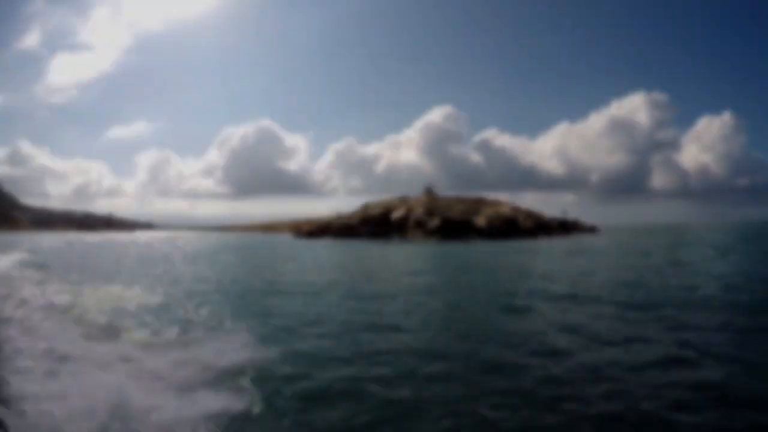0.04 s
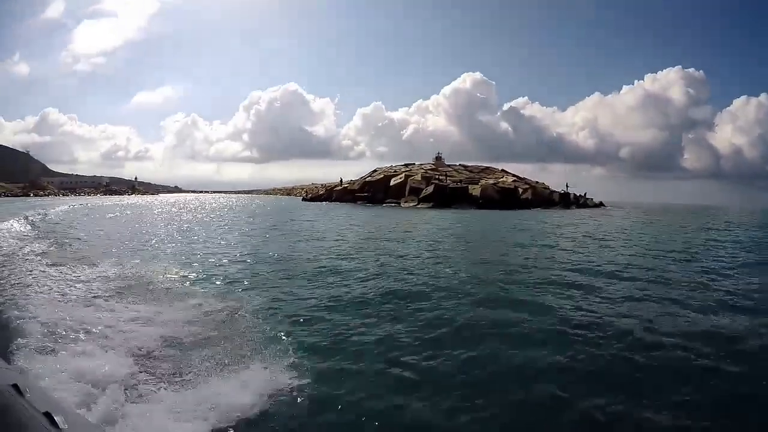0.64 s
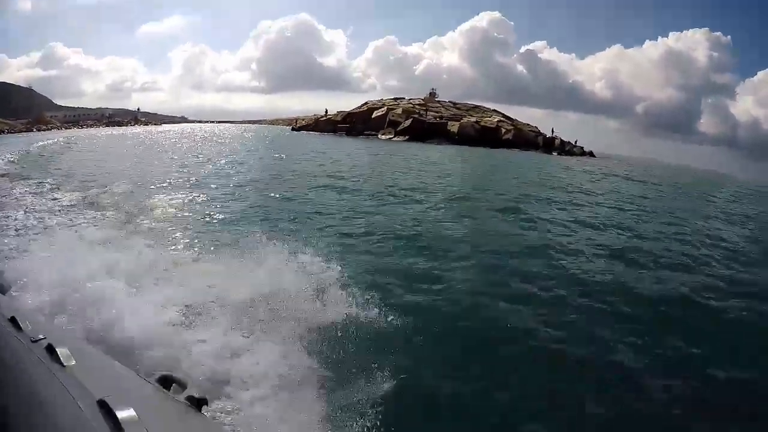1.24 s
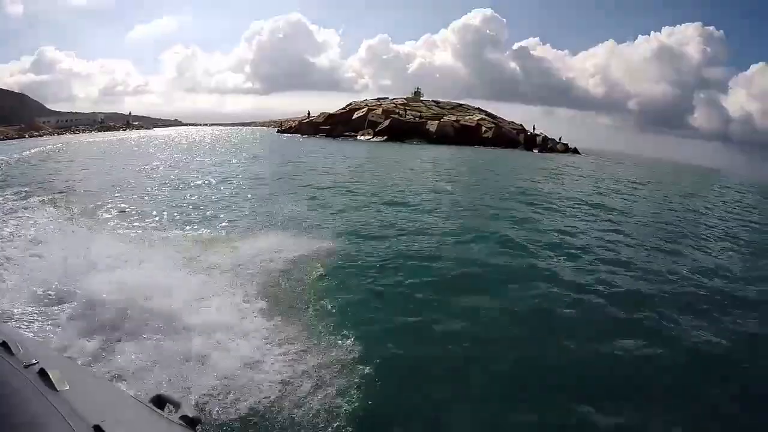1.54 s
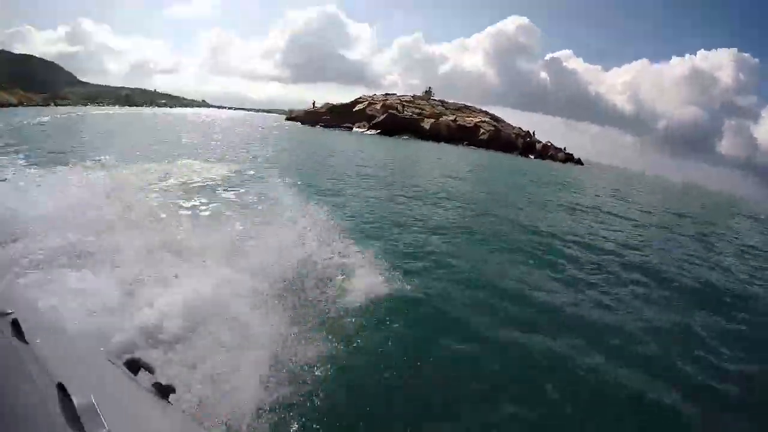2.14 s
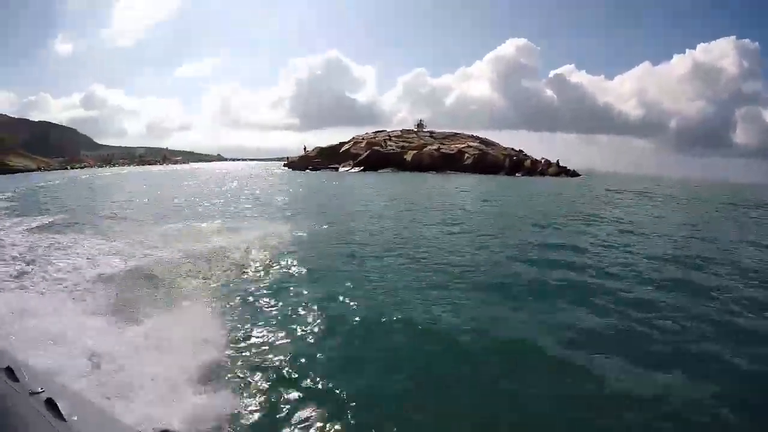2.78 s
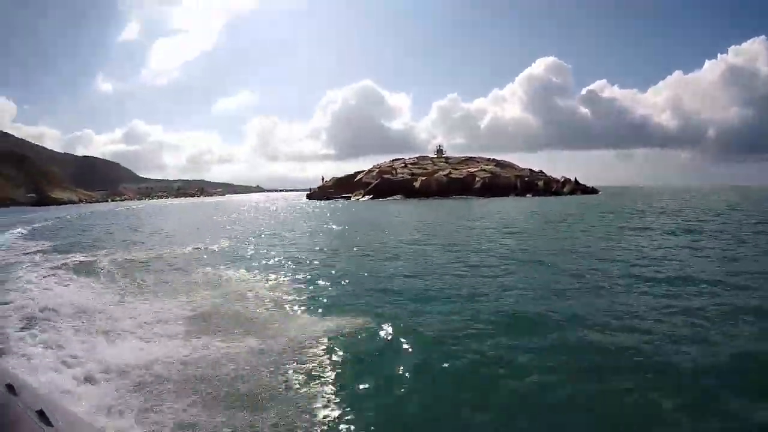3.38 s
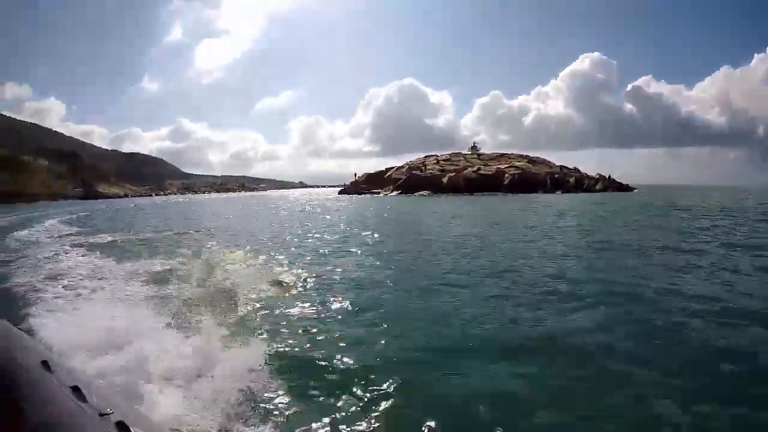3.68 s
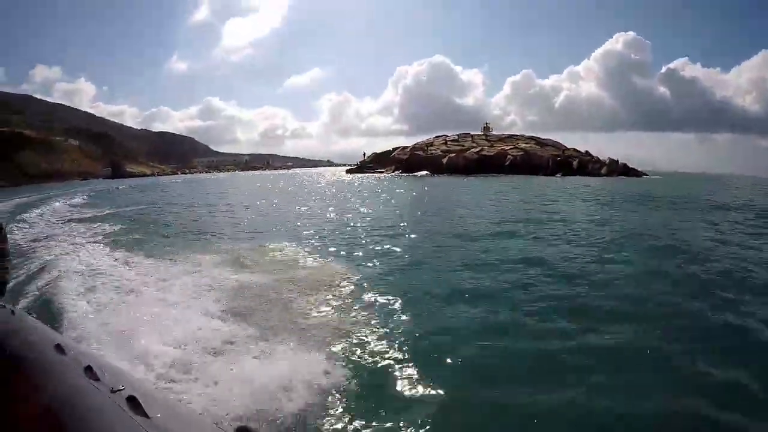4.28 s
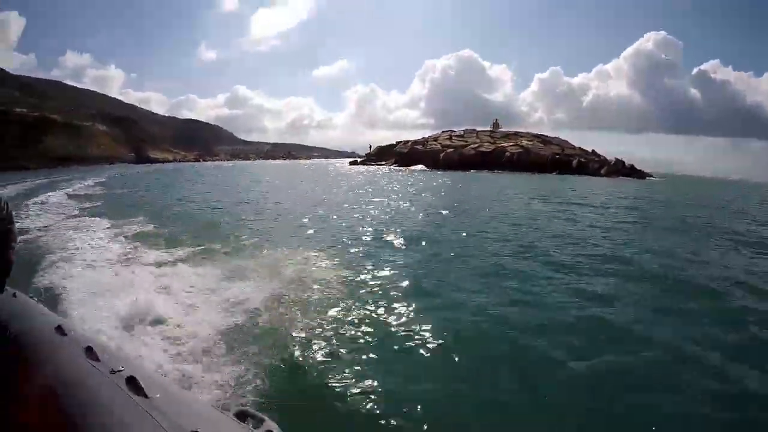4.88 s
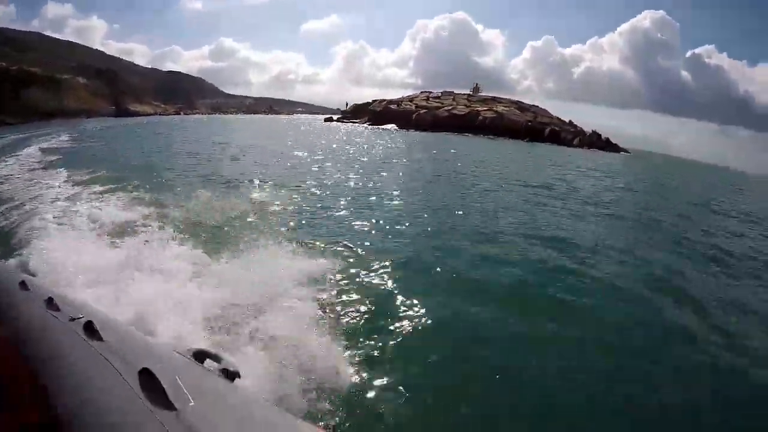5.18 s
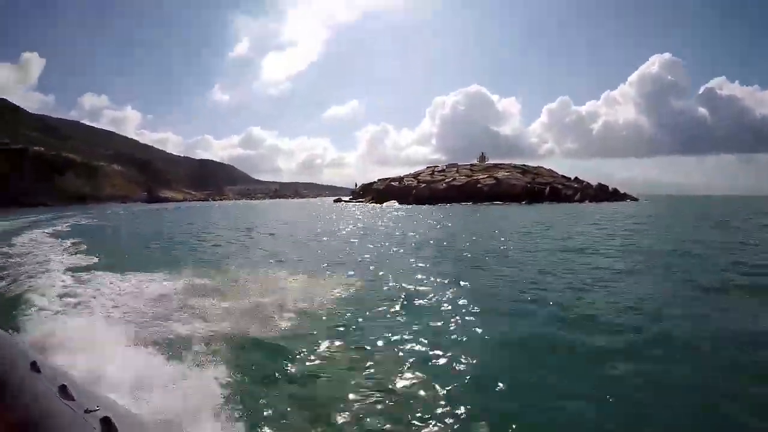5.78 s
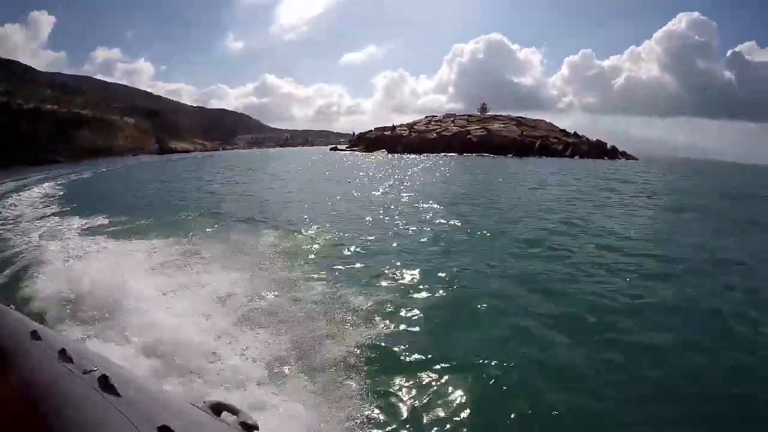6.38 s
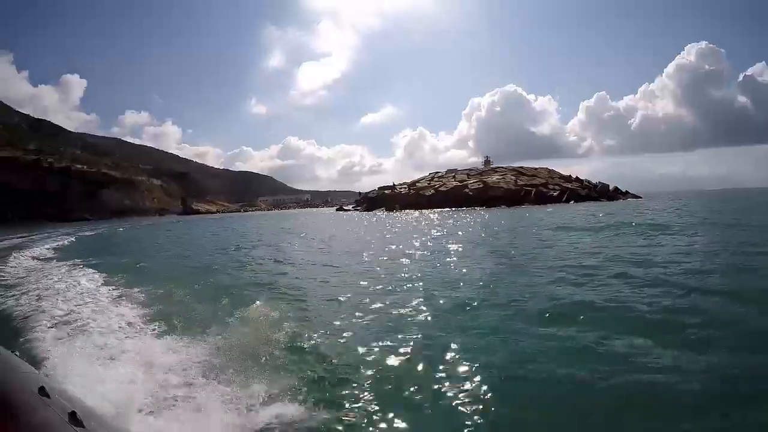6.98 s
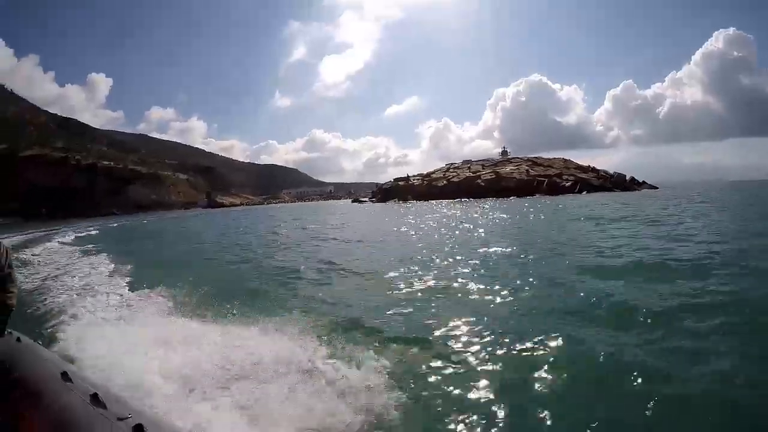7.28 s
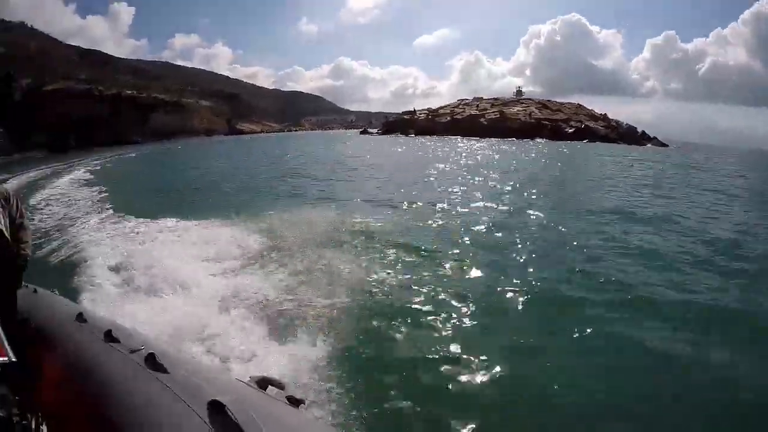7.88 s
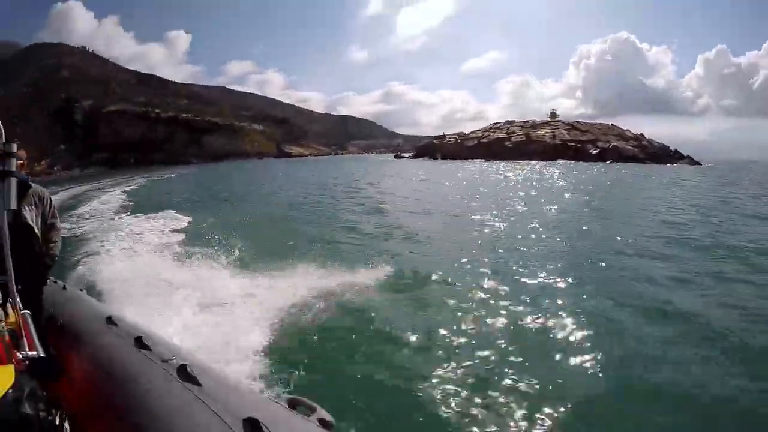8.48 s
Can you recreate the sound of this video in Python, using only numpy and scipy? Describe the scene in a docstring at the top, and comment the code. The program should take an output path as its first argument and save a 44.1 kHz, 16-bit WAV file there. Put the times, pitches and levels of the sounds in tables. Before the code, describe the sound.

Wind buffets the microphone over a boat motor's steady drone and rushing wake, with a few drops of spray knocking close by.

```python
"""Inflatable boat at speed

Wind buffets the microphone while the outboard motor's exhaust pulses blend into a steady drone.
Bubbles in the wake rush and fizz beside the boat, swelling as the hull meets each small wave.
Spray reaches the camera: drops knock on its case, showers spatter it,
and a few blows of air and water thump the microphone opening."""
import sys
import numpy as np
from scipy import signal
from scipy.fft import rfft, irfft
from scipy.io import wavfile
from scipy.ndimage import uniform_filter1d

SR = 44100
rng = np.random.default_rng(int(sys.argv[2]) if len(sys.argv) > 2 else 0)


def int16_out(signal):
    """Quantize to a 16-bit WAV file."""
    q = np.round(np.clip(np.atleast_2d(signal).T, -1, 1) * 32767)
    wavfile.write(sys.argv[1], SR, q.astype(np.int16))


N = 385314
TIME = np.arange(N) / SR

# The airstream on the microphone. Each row: time in seconds, relative strength in dB.
WIND_STRENGTH = [(0, 1.5), (.3, 2.5), (1.1, 1), (1.9, 0.5), (2.9, 0.5), (3.7, -2), (5.8, -0.5), (6.6, -3),
                 (7.4, 0), (7.8, -4), (8.35, -2.5), (8.53, -13.5), (8.74, -8)]
# Gusts and lulls. Each row: middle and length in seconds, then change of surge, buffet, flutter in dB.
GUSTS = [(1.5, .45, 1, 6, -0.5), (2.0, .2, 1, 3.5, 8.5), (2.146, 0.38, 10, -2, -3),
         (2.654, 0.51, 5.5, -0.5, -1.5), (3.392, .2, 9.5, 2, 8.5), (3.736, 0.47, -1, -2.5, 3.5),
         (5.15, 0.54, 1.5, -0.5, 3), (5.778, 0.28, 3.5, 2.5, 3), (6.55, 0.44, -0.5, 0, -2),
         (8.1, 1, -2, 1.5, -1), (8.624, 0.38, -3, -6, 14)]
# The tone of big, medium and small swirls of air. Each row: frequency in Hz, relative level in dB.
SURGE_TONE = [(12, -6), (22, -1.5), (35, -3), (48, -3), (65, -20), (110, -46)]
BUFFET_TONE = [(40, -11.5), (58, -1.5), (80, -1), (110, -5.5), (150, -17.5), (250, -38)]
FLUTTER_TONE = [(80, -13), (125, 2), (170, -2), (240, -9), (330, -14.5), (480, -24.5), (800, -27.5),
                (1600, -65)]
# The motor. Each row: time in seconds, firings per second, level in dB.
ENGINE = [(0, 116.5, -36), (1.2, 115.3, -34), (2.2, 117, -40.5), (3, 118.4, -37.5), (4.2, 118.2, -36.5),
          (5.2, 117.4, -34.5), (6.5, 117.7, -32.5), (7.5, 118.5, -35.5), (8, 116.6, -34), (8.6, 117.6, -32),
          (8.74, 118, -37)]
# The notes in its drone. Each row: multiple of the firing rate, relative level in dB.
EXHAUST_NOTES = [(0.99, 0), (3 / 2, -24.5), (2, -23), (5 / 2, -32.5), (3, -34)]
# Big bubbles under the back of the boat. Each row: time in seconds, relative level in dB.
CHURN_LEVEL = [(0, -47), (1.0, -46.5), (1.7, -49), (3.3, -49.5), (3.55, -46), (4.1, -47), (5.5, -54),
               (5.95, -48.5), (6.8, -53), (7.55, -48), (7.8, -54), (8.4, -56.5), (8.74, -50.5)]
# The tone of big, medium and tiny bubbles. Each row: frequency in Hz, relative level in dB.
CHURN_TONE = [(250, 3.5), (450, 0.5), (650, -1.5), (850, -0.5), (1030, 3.5), (1250, -2), (1700, 1),
              (3000, -42)]
RUSH_TONE = [(800, -13), (1250, -5), (1480, 1.5), (1750, 2), (2050, 3), (2500, 2), (2900, -1.5),
             (3600, -3.5), (4200, -8.5), (4800, -12), (6000, -15), (9000, -42)]
FIZZ_TONE = [(2400, -15), (3700, 4.5), (4600, -7), (5700, -2), (6400, 2), (7000, 1.5), (7600, 2.5),
             (9200, 0), (9900, -4.5), (10600, -6.5), (11500, -12), (13000, -13.5), (15300, -22)]
# The hull meets a wave. Each row: start and length in seconds, then in dB the swell of the foam,
# the swell of the thrown sheet of water, and the foam's dip just before.
WAVES = [(0.0, 0.38, 4, 3, 0), (0.896, 0.25, 1, 3, 0), (1.293, 0.34, 6, 3, 1), (1.827, 0.11, -2, 3.5, 0.5),
         (2.242, 0.14, 7, 3, 1.5), (2.86, 0.13, -1.5, 2.5, 0), (3.22, 0.21, 6, 2.5, -1),
         (3.877, 0.33, 4.5, 4, 5.5), (5.4, 0.26, 3.2, 0, 0), (6.04, 0.083, 6.5, 2.5, 5.5),
         (6.29, 0.53, 4, 2, 1.5), (7.4, 0.31, 4.5, 3.5, 0.5), (8.08, .06, 2.5, 1.5, 0),
         (8.46, .3, 0.5, -1, 8)]
# Spatters of spray, and the low thud of one drop hitting the case.
# Each row: start in seconds, level in dB, length in seconds, low and high edge in Hz.
SPATTERS = [(0.159, -26, 0.0018, 150, 700), (0.277, -34.5, 0.011, 300, 1890),
            (0.38, -26.5, 0.0079, 350, 2770), (1.215, -42, 0.034, 1590, 3000),
            (1.949, -34.5, 0.0081, 170, 1500), (2.043, -30.5, 0.037, 1510, 2680),
            (2.148, -29, 0.0055, 700, 4030), (2.423, -28, 0.0056, 250, 2900),
            (3.298, -39, 0.027, 500, 3200), (3.367, -40.5, 0.018, 4500, 12000),
            (3.374, -30.5, 0.029, 1240, 3280), (3.835, -41, 0.032, 2110, 2900),
            (3.889, -36, 0.009, 900, 3700), (4.184, -45.5, 0.048, 330, 537), (6.235, -38, .014, 1400, 2600),
            (7.153, -31, 0.026, 960, 2870)]
# How the case rings. Each row: pitch in Hz, relative level in dB, seconds to fade by 60 dB.
CASE_RINGS = [(745, -2, 0.0029), (1040, -5.5, 0.0063), (1770, -3.5, 0.0036), (2620, 1.5, 0.004),
              (3230, -7.5, 0.0052), (3970, -8, 0.0088), (4910, -9, 0.0073), (8000, -28, 0.0026)]
# Knocks of drops on the case; rows at nearly the same instant form one hit.
# Each row: start in seconds, relative knock level in dB, treble limit in Hz,
# then the wet spot's pitch in Hz, level in dB and seconds to fade by 60 dB.
KNOCKS = [(0.1606, -24, 12000, 6400, -3.5, 0.0017), (0.1604, -7.5, 2800, 2100, -14, 0.0032),
          (0.1628, -22, 5000, 600, -20, .005), (2.0428, -23, 2800, 1950, -8.5, 0.008),
          (3.371, -15.5, 5000, 1550, -9, 0.012), (3.37, -30, 9000, 3220, -12.5, 0.017),
          (3.3712, -22, 12000, 5230, -16.5, 0.011), (3.3716, -11, 9000, 2520, -4.5, 0.0067),
          (6.086, -30, 4000, 2000, -28, .008), (6.1085, -10, 2500, 1880, -9, 0.0062),
          (6.135, -11, 5500, 4050, -7.5, 0.0075), (6.1356, -35, 2500, 1580, -4, 0.012),
          (6.2311, -8, 2760, 2330, -7.5, 0.0069)]
# Blows on the microphone opening, and at 8.57 s a short burst from the motor. Each row: start in seconds, level
# in dB, pitch in Hz, length in seconds.
THUMPS = [(0.286, -12, 70, 0.016), (0.382, -21, 55, .022), (2.0, -24.5, 187.3, 0.07),
          (2.077, -4.5, 24.5, 0.061), (3.372, -10.5, 130, 0.0087), (3.376, -11.5, 33, 0.044),
          (8.57, -28.5, 169, 0.014)]


def from_db(db):
    """Turn decibels into a number to multiply by."""
    return 10 ** (np.asarray(db) / 20)


def unit_power(x):
    """Scale a sound to an average power of 1."""
    return x / np.sqrt(np.mean(x ** 2) + 1e-20)


def in_time(rows):
    """Join a table's points with straight lines, one curve per column."""
    times, *columns = np.transpose(rows)
    return [np.interp(TIME, times, column) for column in columns]


def coloured(x, tone):
    """Shape a sound by a tone table, fading beyond the table's ends; power 1."""
    hz, db = np.transpose(tone)
    freqs = np.maximum(np.arange(N // 2 + 1) * SR / N, 1)
    edges = np.minimum(freqs / hz[0], 1) ** 2 * np.minimum(hz[-1] / freqs, 1) ** 2
    gain = from_db(np.interp(np.log(freqs), np.log(hz), db))
    return unit_power(irfft(rfft(x) * edges * gain, N))


def drift(rate):
    """A smooth random wander of typical size 1, changing about rate times a second."""
    step = 40  # samples between points
    r = np.exp(-2 * np.pi * rate * step / SR)
    slow = signal.lfilter([1], [1, -2 * r, r * r], rng.standard_normal(N // step + 2002))[2000:]
    return np.interp(np.arange(N) / step, np.arange(len(slow)), unit_power(slow))


def hump(middle_s, length_s):
    """A smooth rise from 0 to 1 and back."""
    return np.cos(np.pi * np.clip((TIME - middle_s) / length_s, -.5, .5)) ** 2


def ring(clicks, hz, fade_s):
    """Each click starts a pure note that fades by 60 dB in fade_s."""
    r = from_db(-60 / (fade_s * SR))
    angle = 2 * np.pi * hz / SR
    return signal.lfilter([0, np.sin(angle)], [1, -2 * r * np.cos(angle), r * r], clicks + 1e-18)


def add(out, start_s, sound):
    """Mix a short sound in at its start time."""
    at = int(start_s * SR)
    out[at:at + len(sound)] += sound[:N - at]


def airstream(tone, hold_s):
    """Swirling air whose force holds steady, as it does on a moving boat."""
    air = coloured(rng.standard_normal(N), tone)
    return air / np.sqrt(uniform_filter1d(air ** 2, size=int(hold_s * SR)))


def wind(buffet_limit_db=-24):
    """Big swirls of air surge past and buffet the microphone; small ones flutter over it."""
    strength, = in_time(WIND_STRENGTH)
    gusts = sum(np.outer(changes, hump(middle, length)) for middle, length, *changes in GUSTS)
    surge_gust, buffet_gust, flutter_gust = gusts
    surge_db = -27.5 + 0.92 * strength + surge_gust + 1.8 * drift(4.7)
    surge = from_db(surge_db) * airstream(SURGE_TONE, hold_s=0.119)
    buffet_db = np.minimum(-30 + 0.94 * strength + buffet_gust, buffet_limit_db) + 1.64 * drift(5.5)
    buffet = from_db(buffet_db) * airstream(BUFFET_TONE, hold_s=0.1)
    flutter = coloured(rng.standard_normal(N), FLUTTER_TONE)
    flutter_db = -38.5 + 1.83 * strength + flutter_gust + 1.66 * drift(33)
    return surge + buffet + from_db(flutter_db) * flutter


def outboard(pitch_waver=0.00487, waver_db=1.6):
    """Exhaust pulses blend into a low drone that wavers in the airstream."""
    firing_hz, level_db = in_time(ENGINE)
    phase = 2 * np.pi * np.cumsum(firing_hz * (1 + pitch_waver * drift(7.1))) / SR
    drone = np.zeros(N)
    for multiple, db in EXHAUST_NOTES:
        gain = from_db(db + waver_db * drift(9.3))
        drone += gain * np.sin(multiple * phase + 2 * np.pi * rng.random())
    return np.sqrt(2) * from_db(level_db) * drone


def bubbles(low_hz, high_hz, per_s, cycles, spread_db, pitches=18):
    """Bubbles burst at random, each ringing for some cycles; power 1."""
    out = np.zeros(N)
    for hz in np.geomspace(low_hz, min(high_hz, SR / 3), pitches):
        when, size_draw, sign_draw = rng.random((int(per_s * TIME[-1] / pitches), 3)).T
        sizes = from_db(-spread_db * np.log(np.maximum(size_draw, np.exp(-4))))
        clicks = np.zeros(N)
        clicks[(when * N).astype(int)] = sizes * np.sign(sign_draw - .5)
        out += unit_power(ring(clicks, hz, cycles / hz)) * np.sqrt(hz)
    return unit_power(out)


def water(tone, near_bubbles, near_db, slosh_db, slosh_rate):
    """Near bubbles stand out from the blur of countless far ones, and it all sloshes."""
    all_bubbles = rng.standard_normal(N) + from_db(near_db) * near_bubbles
    return coloured(all_bubbles, tone) * from_db(slosh_db * drift(slosh_rate))


def swell(start_s, length_s, rise_s=0.12, fall_s=0.21):
    """Spray shoots up as the hull lands, holds, then rains down; 0 to 1."""
    t = TIME - start_s
    return np.clip(np.minimum(.5 + t / rise_s, 1 - (t - length_s) / fall_s), 0, 1)


def wave_levels(foam_rest_db=-54, sheet_rest_db=-45.5):
    """Waves lift the levels (dB) of the foam and the thrown sheet; the bigger wave wins an overlap."""
    foam, sheet, dip = 0, 0, 0
    for start, length, foam_db, sheet_db, dip_db in WAVES:
        foam = np.maximum(foam, foam_db * swell(start, length))
        sheet = np.maximum(sheet, sheet_db * swell(start - 0.034, length))  # the sheet lands first
        dip = dip + dip_db * hump(start - 0.15, length_s=0.33)  # the hull lifts clear before landing
    return foam_rest_db + foam - dip, sheet_rest_db + sheet - 0.43 * dip


def wake():
    """Big bubbles churn, the thrown sheet of water rushes down and plops, the foam fizzes."""
    churn_db, = in_time(CHURN_LEVEL)
    foam_db, sheet_db = wave_levels()
    big = bubbles(338, 1382, per_s=500, cycles=13.5, spread_db=1.5)
    churn = water(CHURN_TONE, big, near_db=-10.5, slosh_db=1.0, slosh_rate=13)
    medium = bubbles(1244, 5010, per_s=2500, cycles=17, spread_db=0)
    rush = water(RUSH_TONE, medium, near_db=-9, slosh_db=1.03, slosh_rate=8)
    plops = coloured(bubbles(1053, 4020, per_s=45, cycles=46, spread_db=5, pitches=30), RUSH_TONE)
    sheet = rush + from_db(-20) * plops
    tiny = bubbles(3700, 13600, per_s=6000, cycles=4.5, spread_db=-1)
    fizz = water(FIZZ_TONE, tiny, near_db=-1.5, slosh_db=1.57, slosh_rate=9.6)
    return from_db(churn_db + 1.6) * churn + from_db(sheet_db) * sheet + from_db(foam_db) * fizz


def spatters(rise_s=.0015, spread_db=7.5, hiss_db=-28):
    """Spray spatters the case and one drop thuds on it: bursts of grainy noise with a faint hiss."""
    out, t = np.zeros(N), TIME[:SR // 4]
    for start, db, length, low_hz, high_hz in SPATTERS:
        grains = rng.standard_normal(len(t)) * from_db(spread_db * rng.standard_normal(len(t)))
        band = signal.butter(2, [low_hz, high_hz], "band", fs=SR, output="sos")
        burst = unit_power(signal.sosfilt(band, grains)) + from_db(hiss_db) * unit_power(grains)
        fall_s = .003 + 0.64 * length  # long bursts linger
        shape = (1 - np.exp(-t / rise_s)) * np.exp(-np.maximum(t - length, 0) / fall_s)
        add(out, start, from_db(db) * shape * burst)
    return out


def drop_knocks():
    """Drops knock on the case and the wet spot rings briefly; one hit can have several layers."""
    out, click = np.zeros(N), signal.unit_impulse(SR // 20)
    case = sum((-1) ** k * from_db(db) * ring(click, hz, fade_s)
               for k, (hz, db, fade_s) in enumerate(CASE_RINGS))
    for start, db, treble_hz, spot_hz, spot_db, fade_s in KNOCKS:
        knock = from_db(db + 2) * case + from_db(spot_db) * ring(click, spot_hz, fade_s)
        soften = signal.butter(2, treble_hz, fs=SR, output="sos")  # softer contact sounds duller
        add(out, start, signal.sosfilt(soften, knock))
    return out


def thumps():
    """A blow on the microphone opening briefly swings the pressure to and fro; a short burst from the motor at
    8.57 s is made the same way."""
    out = np.zeros(N)
    for start, db, hz, length in THUMPS:
        t = TIME[:int(length * SR)]
        add(out, start, from_db(db) * np.sin(np.pi * t / length) * np.sin(2 * np.pi * hz * t))
    return out


def scene():
    """Everything meets at one microphone in the open air."""
    return (wind() + outboard() + wake() + spatters() + drop_knocks() + thumps())[None]


def record(dry, peak_limit=.75, cutoff_hz=15300):
    """Round off the tallest peaks and cut away the highest treble."""
    rounded = dry / (1 + (dry / peak_limit) ** 4) ** .25
    return signal.sosfilt(signal.ellip(10, .1, 80, cutoff_hz, fs=SR, output="sos"), rounded)


dry = scene()
out = record(dry)
int16_out(out)
```